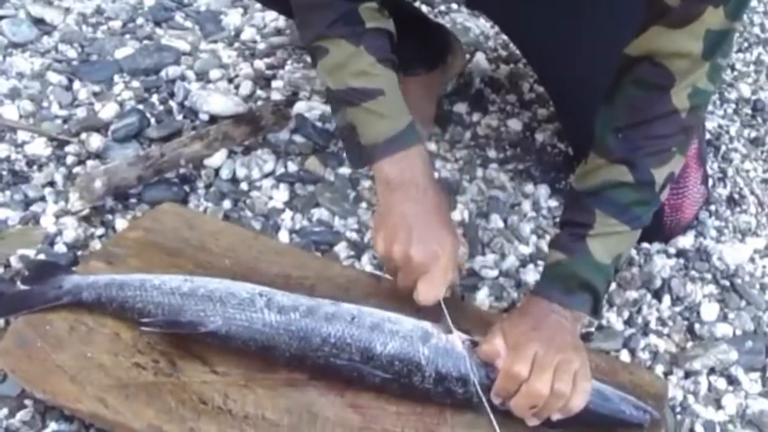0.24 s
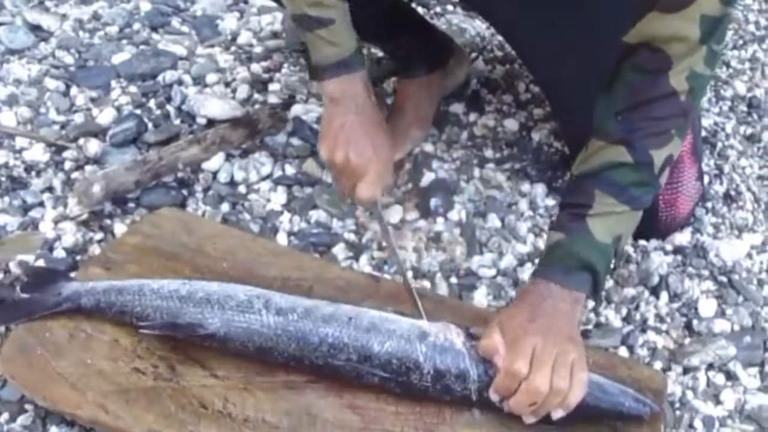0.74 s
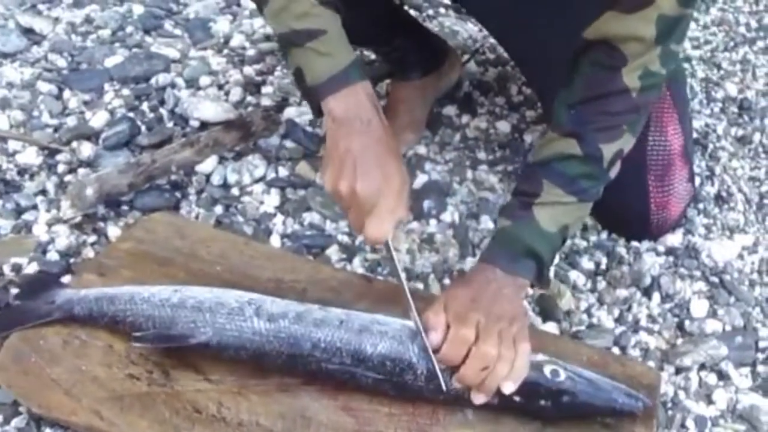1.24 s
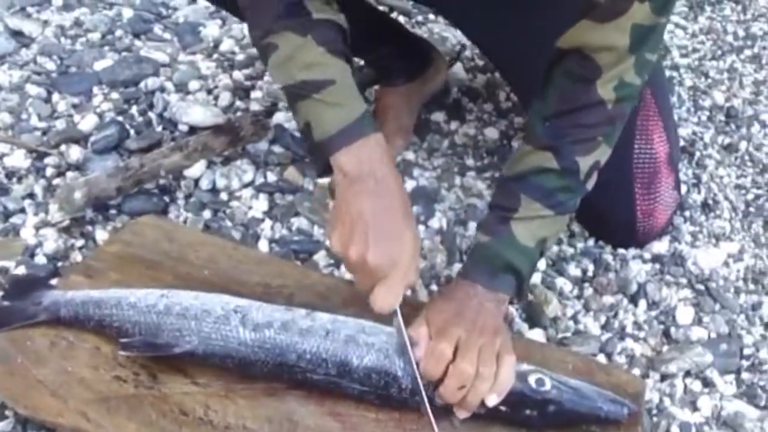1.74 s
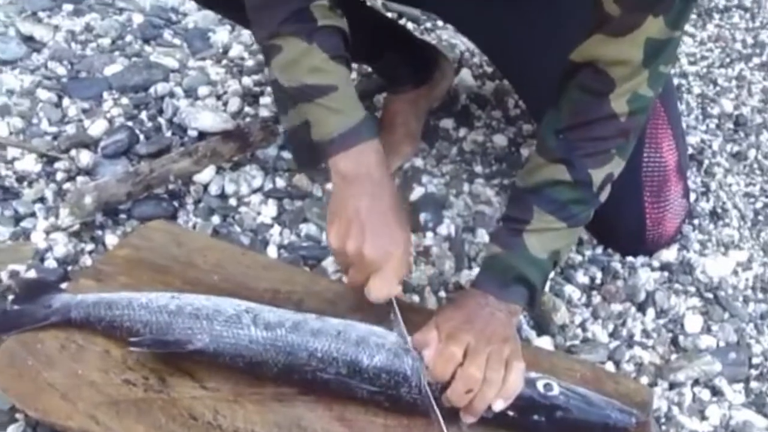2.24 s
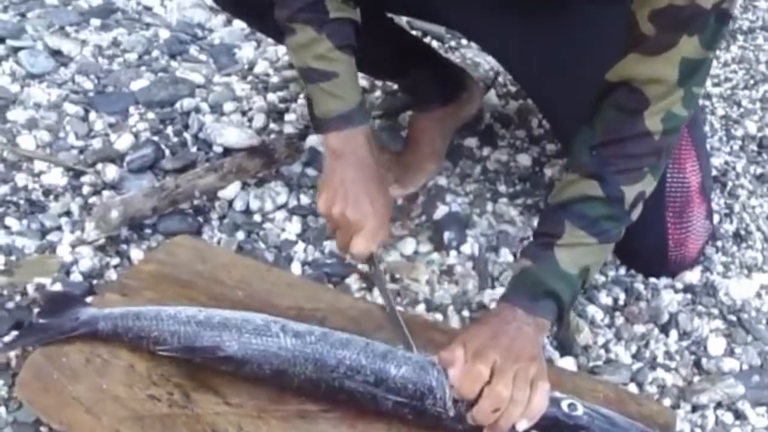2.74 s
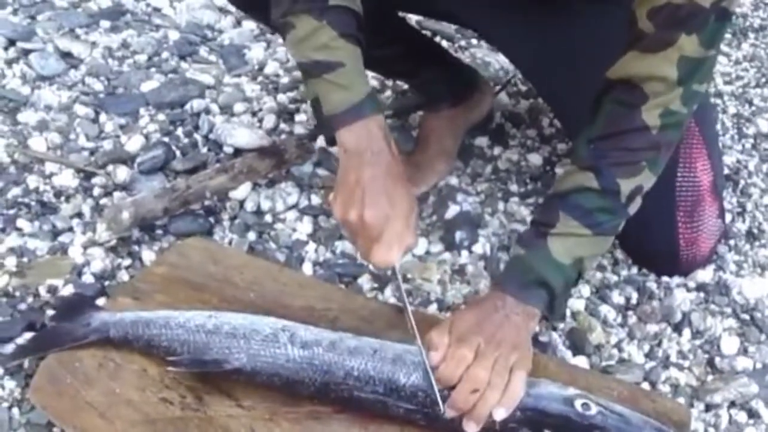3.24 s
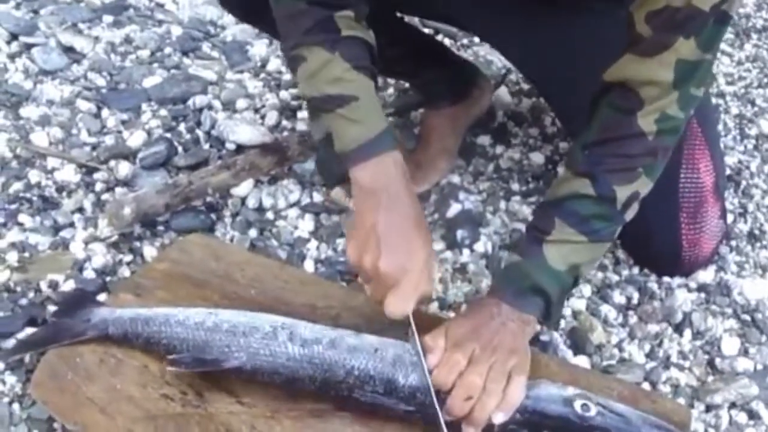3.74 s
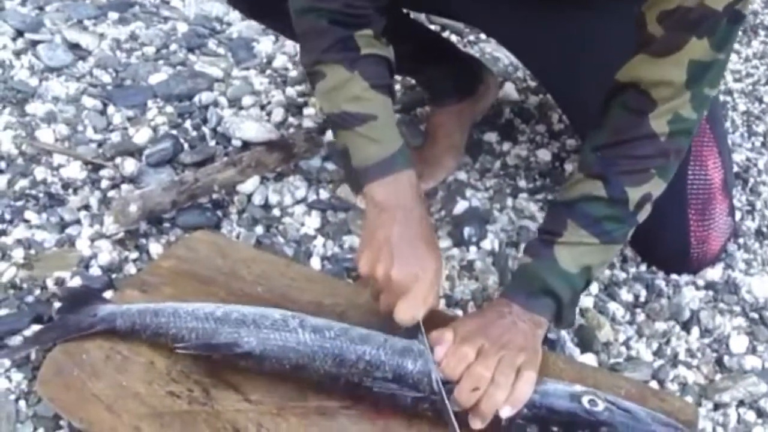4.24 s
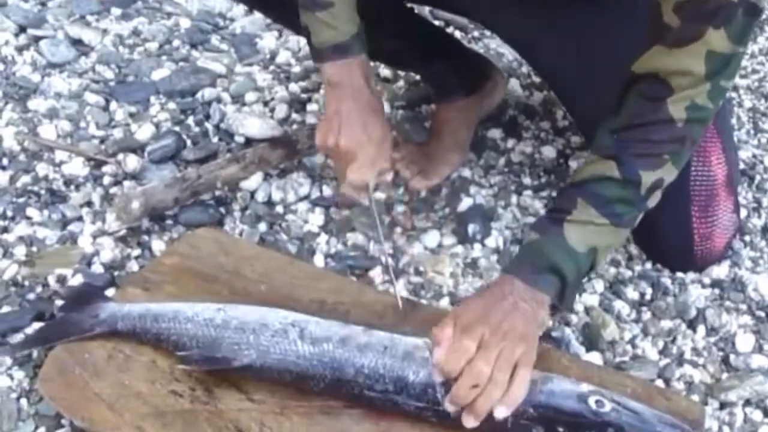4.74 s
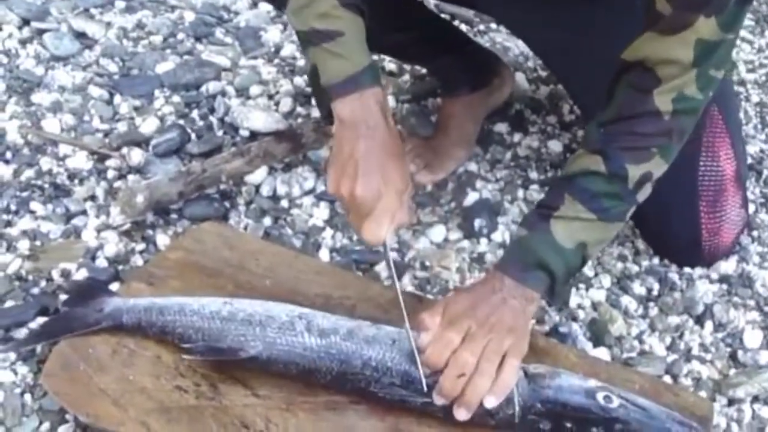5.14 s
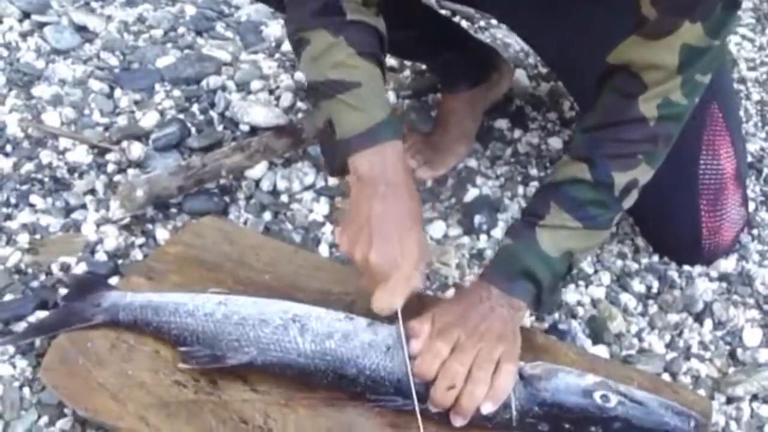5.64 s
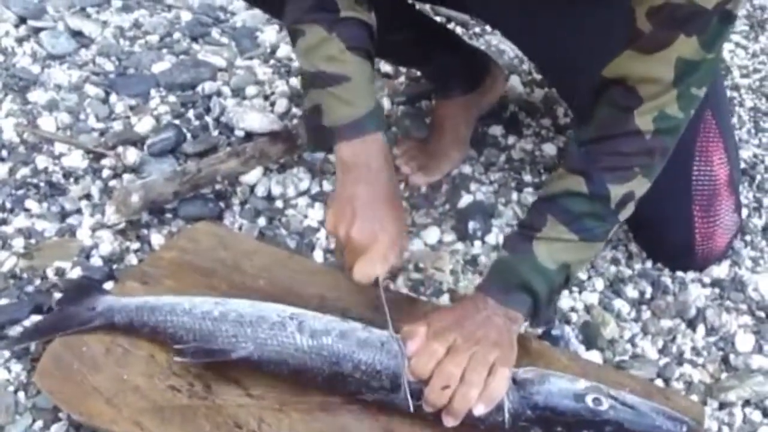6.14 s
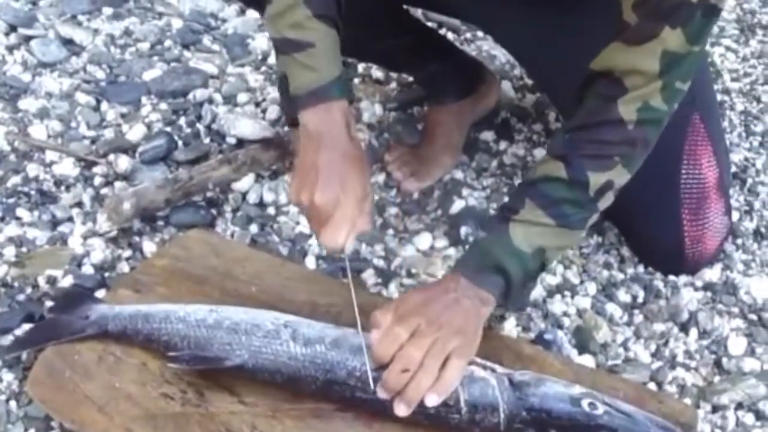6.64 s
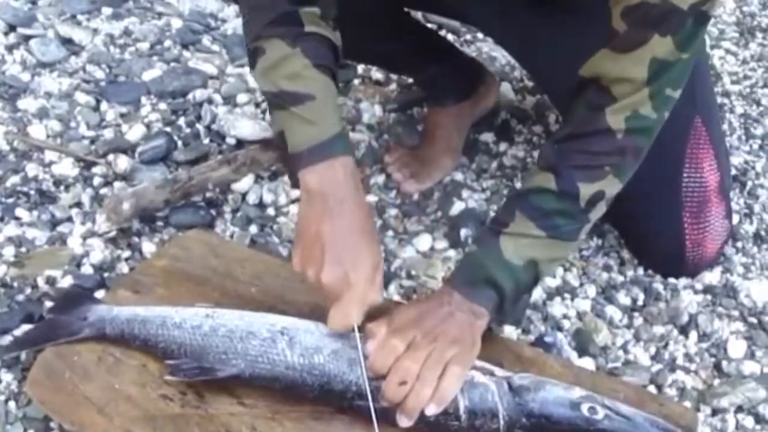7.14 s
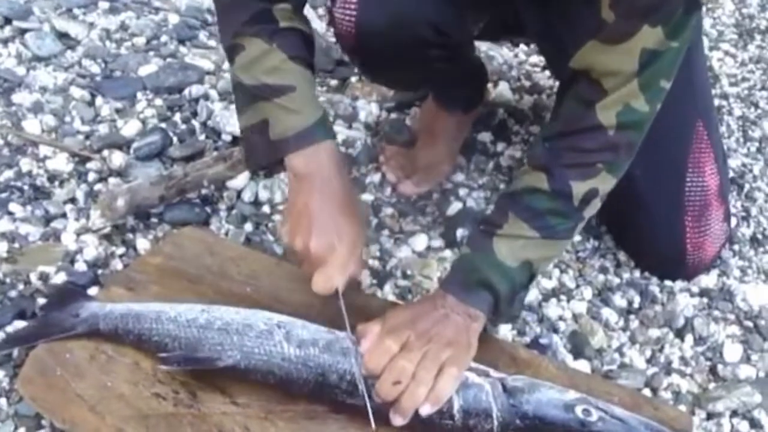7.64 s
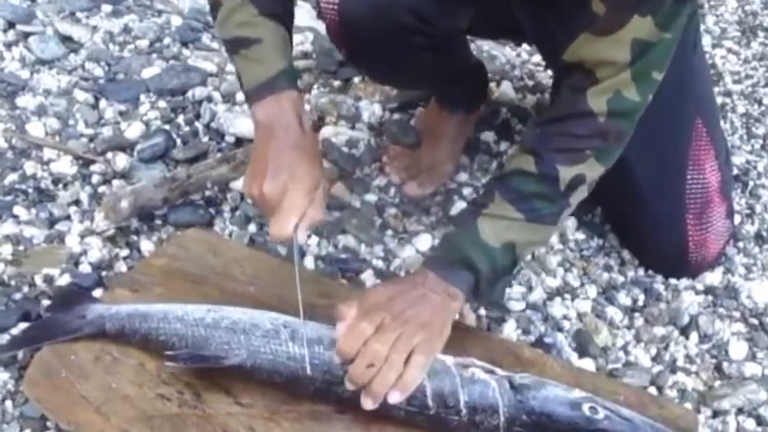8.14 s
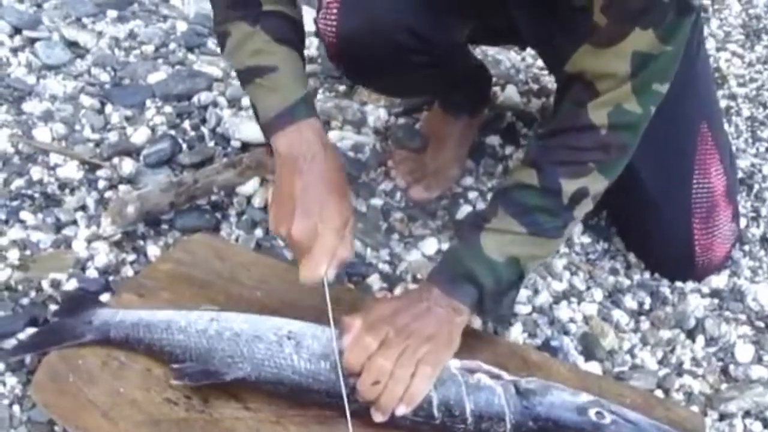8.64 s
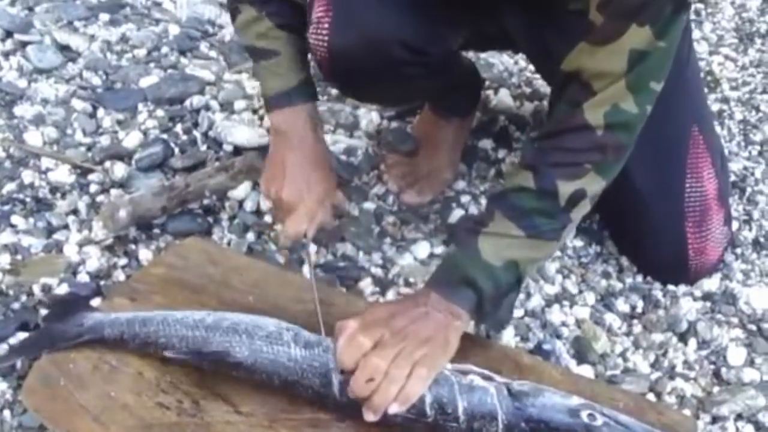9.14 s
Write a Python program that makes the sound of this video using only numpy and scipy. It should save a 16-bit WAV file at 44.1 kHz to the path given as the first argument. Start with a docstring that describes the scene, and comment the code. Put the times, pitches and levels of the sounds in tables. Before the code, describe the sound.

Quiet trickling wash swells into a rattling pebble surge, ebbs, then rises again, amid stony clicks, watery plops and soft board knocks.

```python
"""Waves on pebbles and a fish being scored

Small waves wash up and draw back over a pebble beach, heard through a small boxy microphone.
The wash is filtered noise for foam, short resonances for rolling pebbles, and gliding notes for air pockets.
Close by a fish is scored with a knife on a wooden board: decaying board modes give dull knocks, brief
rings and noise give stone clacks, high notes give thin ticks, and dense clicks give short scrapes."""
import sys
import numpy as np
from scipy import signal
from scipy.fft import rfft, irfft
from scipy.io import wavfile

SR = 44100
rng = np.random.default_rng(int(sys.argv[2]) if len(sys.argv) > 2 else 0)


def transcribe(u):
    """Save the signal u as a 16-bit wav file named by the first command-line argument.

    u: samples, shape (n,) or (channels, n), limited to [-1, 1]; the rate is SR.
    q: integer samples, one column per channel.
    """
    v = np.clip(np.atleast_2d(u).T, -1, 1)
    q = np.round(v * 32767).astype(np.int16)
    wavfile.write(sys.argv[1], SR, q)


N = 414540

# Course of the surge. Each row: time in seconds, level of the pebble-rattle register in dB before
# splashes, bass above its usual share in dB, treble above its usual share in dB.
SURGE = [(0.0, -33.5, -7.5, -1), (0.23, -41.5, 0, 5.5), (1.15, -38, 0.5, 3), (1.54, -37, 0.5, 2.5),
         (1.7, -34, 1, 1), (2.1, -31.5, -1.5, 0.5), (2.8, -32, 1, 1.5), (3.3, -30, 0, 0.5),
         (3.92, -25.5, 0, 2), (4.02, -21.5, 1.5, 1.5), (4.3, -19.5, 0, 0.5), (4.68, -22, 0.5, 0.5),
         (4.97, -20.5, -1, 1.5), (5.2, -21.5, 1, 0.5), (5.44, -22, -3, 2), (5.89, -22.5, -4.5, -1.5),
         (6.05, -22, -2, -0.5), (6.19, -23.5, 0.5, 0), (6.44, -22.5, -2, -2), (6.56, -22.5, -6, -0.5),
         (6.8, -21.5, -1, -0.5), (7.15, -25, -5, 0), (7.27, -27.5, -6, 1), (7.67, -30.5, -4, 3),
         (8.09, -30.5, -4.5, 2), (8.35, -31.5, -2.5, 3), (8.58, -28, -3, -0.5), (8.77, -27, -4, 2),
         (8.86, -21.5, -4, -2.5), (9.06, -23, 0.5, -1.5), (9.2, -24.5, -0.5, 0), (9.28, -23, 2, -2),
         (9.4, -24.5, -3, -1)]
# Wavelets slapping the stones change the level of the whole wash for a moment.
# Each row: time of the extreme in seconds, lift in dB, length in seconds.
SPLASHES = [(0.442, 0, 0.033), (0.652, 4, 0.039), (1.68, 3, 0.038), (1.953, 2, 0.098), (2.177, 1.5, 0.062),
            (2.904, 1, 0.2), (3.813, 3, 0.047), (4.29, -1.5, 0.22), (4.908, 1.5, 0.045), (5.35, 1.5, 0.23),
            (6.048, 0, .1), (6.3, 1.5, 0.048), (6.822, 3, 0.056), (6.974, 1, 0.13), (7.165, 2, 0.034),
            (7.853, 3, 0.11), (8.14, 3.5, 0.13), (8.236, 2.5, 0.091), (8.84, 1, .08)]
# Broad foam crests brighten the hiss near 7 kHz. Each row: peak time in seconds, lift in dB, length in seconds.
CRESTS = [(6.7, 3.5, 1), (8.95, 2, 0.85)]
# Borders between the six registers of the wash, rising, in Hz.
REGISTER_BORDERS_HZ = (633, 1502, 3984, 6000, 8300)
# Usual levels of the three spray registers against the rattle, from low to high, in dB.
SPRAY_LEVELS_DB = (-21, -18.5, -21)
# Bass roll-off of the microphone housing. Each row: frequency in Hz, gain in dB.
HOUSING_BASS = [(30, -53), (100, -41), (150, -14.5), (320, -1), (480, -1.5), (700, -6)]
# Resonances of the microphone housing above the bass. Each row: frequency in Hz, gain in dB.
HOUSING_RESONANCES = [(900, -3), (1120, -1.5), (1450, -7), (1650, -5), (1950, -1.5), (2250, 1),
                      (2700, -0.5), (3000, -4.5), (3200, -9), (3450, -15), (3840, -26), (5200, -12.5),
                      (5760, -24.5), (7400, -14), (8100, -21), (9000, -13), (9750, -17), (10400, -16)]
# Air pockets that close with a gliding note. Each row: start in seconds, level in dB before the wobble,
# starting pitch in Hz, time to decay by 60 dB in seconds, glide as share of the pitch per second.
PLOPS = [(0.640, -25, 660, 0.072, 26.5), (0.650, -27, 915, .04, 38), (0.814, -27, 592, 0.071, 4),
         (1.70, -24, 700, 0.045, 8), (1.745, -22, 960, .05, 14), (3.336, -31, 260, 0.17, -4.5),
         (3.385, -25, 364, 0.16, 4), (3.42, -23, 430, .06, 0), (3.685, -27, 339, 0.18, 2.5),
         (3.976, -23, 480, 0.061, 18), (3.995, -14, 380, 0.027, 1), (4.201, -25, 236, 0.2, 7),
         (5.085, -30, 273, 0.07, 19), (5.824, -24, 308, 0.055, 9), (6.075, -7, 410, 0.024, 11),
         (6.325, -11, 1100, 0.033, -6), (6.41, -21, 1060, 0.044, 4), (6.461, -16, 358, 0.036, 4),
         (6.785, -19, 614, .04, 2), (6.245, -17, 269, 0.039, 7), (6.401, -30, 341, 0.43, 4.5),
         (6.77, -13, 234, 0.041, -3), (6.83, -18, 980, .04, 4), (6.836, -12, 1260, 0.053, 3),
         (6.882, -11, 1150, .025, 4), (6.83, -31.5, 333.6, 0.94, 4), (7.162, -16, 550, 0.042, 1),
         (7.254, -6, 1330, 0.026, -3), (2.356, -21, 1970, 0.065, -1), (2.484, -22, 2170, .05, 9),
         (2.552, -25, 2150, 0.071, 6), (9.335, -13, 950, .04, 1), (8.143, -6, 1080, 0.017, 14),
         (8.2445, -15, 710, 0.028, 4), (8.251, -15.5, 896, 0.041, 29), (8.265, -20, 885, 0.054, -3),
         (8.284, -18, 750, 0.037, -13), (8.128, -20, 814, .04, 4), (8.122, -22, 1150, .03, 4),
         (8.30, -16, 1560, 0.032, -3), (8.312, -21, 1150, .03, -4), (2.74, -16, 1010, 0.027, 4),
         (8.745, -33, 378, 0.12, 3.5), (8.979, -16, 320, 0.037, 23)]
# Knife or hand landing on the board. Each row: start in seconds, base level in dB,
# hardness in dB per octave, share of the free ring time.
KNOCKS = [(0.7454, -23, -5, 0.52), (1.943, -18.5, -2, 0.82), (2.101, -23.5, -9, 1.1),
          (2.7986, -13, 8, 1.15), (3.791, -26, 6, 1.2), (4.628, -14, 6, 1.1), (6.346, -10, 2, 0.79),
          (6.947, -15.5, -5, 1.1), (7.879, -11.5, 4, 1.13), (8.133, -27, -12, 1.1), (9.1733, -7.5, 8, 0.73)]
# Modes of the wooden board. Each row: frequency in Hz, level in dB, free time to decay by 60 dB in seconds.
BOARD_MODES = [(717, 7, 0.016), (356, -15, 0.047), (452, -9, 0.033), (608, -7.5, 0.058), (800, -4.5, 0.016),
               (950, -3.5, 0.025), (1150, -12, .02), (1425, -12, 0.028), (2400, -24, 0.0076)]
# Stone on stone. Each row: start in seconds, level of the ring in dB, pitch in Hz, crack against ring in dB.
CLACKS = [(0.006, -26, 2400, -7), (0.014, -29, 1980, -4), (0.031, -34, 2270, 4), (0.061, -24, 1990, -8),
          (0.0664, -19, 2190, -19.5), (0.135, -30, 2480, -2), (0.142, -23, 2100, 0),
          (0.1465, -21, 2140, -5), (0.302, -20, 1580, -7), (0.379, -23, 2500, -4), (0.417, -23, 2250, 4),
          (0.4322, -29, 2560, 19), (0.4406, -21, 2840, -1), (0.4496, -22, 2620, 6), (0.6793, -22, 1890, -9),
          (0.6985, -22, 1880, 5), (0.726, -30, 2730, -2), (0.7303, -19, 2700, 7), (0.7369, -19, 2280, 2),
          (0.8145, -20, 2650, 0), (0.8164, -12.5, 2050, 4), (0.8216, -19, 1870, -4), (0.838, -23, 1750, -3),
          (0.8656, -18, 2400, -8), (1.047, -24, 2550, 8), (1.2583, -21, 2900, 4), (1.262, -27, 2180, -2),
          (1.321, -22, 1270, -8), (1.63, -19, 2450, 8), (1.698, -18, 1370, -13), (2.1934, -14.5, 2280, -13),
          (2.4813, -19, 2030, 3), (2.387, -17, 2400, -6), (2.5227, -16, 2100, -3), (2.7987, -16, 1510, 9),
          (3.4874, -11.5, 2200, -13), (3.9853, -9, 2220, 5), (4.234, -6, 2000, 5), (4.2991, -5, 1990, -11),
          (5.3857, -7, 2280, 3), (5.643, -3, 2400, -3), (5.663, -8, 2370, -8), (5.754, -10, 2400, -14),
          (6.4677, -8, 2100, 5), (6.637, -4, 2220, -4), (6.705, -21, 2310, -8), (6.821, -8, 2400, -5),
          (6.9253, -10, 2570, 1), (7.124, -10, 2420, -8), (7.2535, -17, 2100, 6), (7.3868, -10, 2500, 5),
          (7.536, -12, 2860, -12), (7.6989, -11.5, 1260, 12), (7.7038, -13, 2500, 1),
          (7.7072, -15, 2430, -6), (7.792, -15, 2570, 3), (7.8384, -15, 2480, 9), (8.1128, -14, 1900, -2),
          (8.132, -4.5, 2270, -5), (8.141, -8, 2300, -2), (8.148, -16, 2150, 0), (8.166, -18, 2050, -2),
          (8.174, -19, 2300, -2), (8.156, -13, 2500, -8), (8.185, -23, 2550, -6), (8.2092, -6.5, 1990, -16),
          (8.2045, -15, 1470, -5), (8.2218, -13, 2400, 3), (8.229, -17, 2150, -4), (8.264, -25, 3050, -6),
          (8.39, -13.5, 2060, 6), (8.5944, -21, 2280, -5)]
# Blade on scales. Each row: start in seconds, base level in dB, base pitch in Hz.
TICKS = [(0.2997, -47, 7520), (0.4415, -46, 4600), (0.4503, -45, 4500), (0.4708, -36, 9150),
         (0.7166, -36, 7940), (0.7309, -39, 4400), (0.8174, -40, 5700), (0.8155, -36, 9000),
         (0.8869, -38, 9050), (1.044, -33, 8700), (1.281, -38, 8700), (1.497, -43, 7380),
         (1.5594, -42, 4300), (2.0145, -33, 7700), (2.1101, -32, 7650), (3.1398, -33, 7600),
         (3.5947, -39, 6510), (5.9434, -28, 7110), (6.832, -33, 7500), (7.182, -30, 5000),
         (7.365, -26, 8650), (7.381, -32, 8600), (7.415, -27, 7500), (7.443, -27, 9200), (7.445, -22, 9000),
         (7.4975, -31, 7300), (7.5, -24, 7200), (7.5, -22, 9350), (7.507, -34, 8900), (7.7897, -31, 8600),
         (8.0052, -29.5, 8950), (8.4726, -34, 8910), (8.4996, -34, 6820)]
# Blade drawn across scales. Each row: start in seconds, length in seconds, peak level in dB.
SCRAPES = [(7.343, 0.115, -33.5), (7.774, 0.068, -34.5)]
# Low thumps, heard now and then. Each row: start in seconds, level in dB, pitch in Hz.
THUMPS = [(0.817, -36, 220), (8.131, -37, 150), (8.982, -38, 190)]

BASS_DB, SLOSH_DB = -14, -4  # usual levels of the two lowest registers against the rattle
SLOSH_FOLLOWS_BASS = 0.76  # share of the bass swing felt near 1 kHz
BASS_LUMPS_DB = 3
SWELL_RISE_SHARE = 0.85  # rise of a swell as a share of its fall
BUBBLES_PER_S, BUBBLE_LOW_HZ, BUBBLE_HIGH_HZ = 110, 700, 2700
BUBBLE_CYCLES = 84  # cycles in a decay of 60 dB
BUBBLE_RISE_PER_CYCLE = 0.00596  # mean share of the starting pitch gained per starting cycle
BUBBLE_SPREAD_DB = 3
STONE_T60_S = 0.015
SCRAPE_SWELL_DB, SCRAPE_RELEASE_S = 9, 0.045
NEAR_FOOT_HZ = 263  # bass limit of the nearby bodies
FAR_SEA_DB = -63.5
UNDERTOW_DB, UNDERTOW_FOLLOWS_BASS = -42, 1.6  # deep roll against the rattle, and its share of the bass swing
CUTOFF_HZ = 10985


def wash():
    """Superposition: foam, stones, spray and bubbles add up, and six registers follow the surge unequally."""
    level_db, weight_db, spray_db = in_time(SURGE)
    level_db = level_db + swells(SPLASHES)

    pebbles = grains(1000.0, 2.4, 560, 3300, cycles=11.5, clump_db=2.0)
    chips = grains(500.0, 2.55, 1000, 4100, cycles=7.1, clump_db=4.5)
    fizz = grains(4000.0, 1.85, 3550, 9900, cycles=8.9, clump_db=3.0)
    gurgles = grains(70.0, 0.66, 169.0, 860, cycles=27.0, clump_db=3.5)
    water = foam(0.3, 1.55)
    water = water + from_db(-12.5) * pebbles + from_db(-13.0) * chips
    water = water + from_db(-5.0) * fizz + from_db(-16.0) * gurgles
    water = water + from_db(-13.5) * bubbles()
    water = coloured(water[None])[0]

    low, middle, high, crest, top = REGISTER_BORDERS_HZ
    spray_low_db, spray_crest_db, spray_top_db = SPRAY_LEVELS_DB
    registers = [
        (low, "low", BASS_DB + weight_db + BASS_LUMPS_DB * drift(2.0)),
        ([low, middle], "band", SLOSH_DB + SLOSH_FOLLOWS_BASS * weight_db),
        ([middle, high], "band", 0),  # the rattle
        ([high, crest], "band", spray_low_db + spray_db),
        ([crest, top], "band", spray_crest_db + spray_db + swells(CRESTS)),
        (top, "high", spray_top_db + spray_db),
    ]
    total = np.zeros(N)
    for hz, kind, db in registers:
        total += rms_one(filtered(water, 4, hz, kind)) * from_db(db)
    return from_db(level_db) * total


def foam(shared_db, own_db):
    """Modulated noise: bursting foam is white noise in narrow bands that swell together and flicker alone."""
    together = drift(11.0)
    edges = np.r_[20, 90 * 2 ** np.arange(0, 7.3, .4)]  # Hz
    white = rng.standard_normal((2, N))
    out = 0
    for k, (low, high) in enumerate(zip(edges, edges[1:])):
        # neighbouring bands draw on separate noises
        band = filtered(white[k % 2], 2, [low, high], "band")
        out = out + band * from_db(shared_db * together + own_db * drift(24.0))
    return rms_one(out)


def grains(per_s, spread_db, low_hz, high_hz, cycles, clump_db):
    """Impulse excitation: random clicks of uneven size, in clumps, set short resonances ringing; rms 1."""
    sizes = from_db(spread_db * np.minimum(rng.exponential(1, N), 4.2)) * rng.choice([-1, 1], N)
    born = rng.random(N) < per_s * from_db(clump_db * drift(9.0)) / SR
    clicks = sizes * born
    pitches = np.geomspace(low_hz, high_hz, 11)
    dealt = rng.integers(0, 11, N)
    out = np.zeros(N)
    for k, hz in enumerate(pitches):
        # weight by pitch keeps the overall spectrum flat
        out += hz / SR * ring(clicks * (dealt == k), hz, cycles / hz)
    return rms_one(out)


def bubbles():
    """Bubble resonance: bursts in clusters of three, each a note that rises as it dies; rms 1."""
    out = np.zeros(N)
    draws = rng.random((int(BUBBLES_PER_S * N / SR), 5))
    for k, (when, place, size, delay, centre) in enumerate(draws):
        if k % 3 == 0:  # a new cluster
            start, pitch = when * (N / SR - .1), centre
        octave_share = pitch + 0.247 * (place - .5)
        hz = BUBBLE_LOW_HZ * (BUBBLE_HIGH_HZ / BUBBLE_LOW_HZ) ** octave_share
        db = -BUBBLE_SPREAD_DB * np.log(size + .02) + 20 * np.log10(hz / SR) / 2
        rise_per_s = BUBBLE_RISE_PER_CYCLE * hz * 2 * place
        add(out, start + .04 * delay, db, hz, BUBBLE_CYCLES / hz, rise_per_s, .003)
    return rms_one(out)


def plops():
    """Cavity resonance: each closing air pocket sounds a dying note, mostly gliding up, of wobbling strength."""
    out = np.zeros(N)
    for s, db, hz, t60, glide in PLOPS:
        add(out, s, db, hz, t60, glide, .004)
    return out * from_db(2.7 * drift(200.0))


def board():
    """Modal excitation: knocks strike every mode, hard ones favour high modes, a resting hand damps the ring."""
    out = np.zeros(N)
    chance_db = rng.normal(0, 1.5, (len(KNOCKS), len(BOARD_MODES)))
    for (s, db, hard_db, ring_share), luck in zip(KNOCKS, chance_db):
        for (hz, mode_db, t60), luck_db in zip(BOARD_MODES, luck):
            tilt_db = hard_db * np.log2(hz / 700)
            add(out, s, db + mode_db + luck_db + tilt_db, hz, t60 * ring_share, 0, .0011)
    return out


def clacks():
    """Impact: one sharp contact with a gritty tail, in the housing colour, beside a short ring."""
    rings, contact = np.zeros(N), np.zeros(N)
    t = np.arange(900) / SR
    noise = rng.standard_normal(N)
    for s, db, hz, grit_db in CLACKS:
        add(rings, s, db, hz, STONE_T60_S, 0, .0010)
        at = round(s * SR)
        tail_db = db + grit_db - 19.0 - 60 * t / (1.1 * STONE_T60_S)
        contact[at:at + len(t)] += from_db(tail_db) * noise[at:at + len(t)]
        contact[at] += from_db(db + grit_db)
    unit = np.max(np.abs(coloured(np.eye(1, 900))))  # peak of a coloured unit click
    crack = filtered(coloured(contact[None])[0], 3, [1000, 3700], "band")
    return rings - crack / unit


def ticks():
    """Damped modes: tiny snaps of blade on scales ring on several high pitches and die at once."""
    out = np.zeros(N)
    for s, db, hz in TICKS:
        for ratio, part_db in [(1.005, 10.5), (0.82, 7.0), (0.934, 8.0), (0.53, -6.0)]:
            add(out, s, db + part_db, hz * ratio, .005, 0, .0004)
    return out


def scrape():
    """Stick and slip: dense tiny snaps as the edge skips over scales; each stroke swells, then lets go."""
    t = np.arange(N) / SR
    strokes = np.zeros(N)
    for s, length, db in SCRAPES:
        end = s + length + SCRAPE_RELEASE_S
        corners_s = [s - .01, s, s + length, end]
        corners_db = [db - 40, db - SCRAPE_SWELL_DB, db, db - 40]
        active = (t > s - .01) * (t < end)
        strokes += active * from_db(np.interp(t, corners_s, corners_db))
    return strokes * grains(5000.0, 2.5, 7000, 10300, cycles=22.0, clump_db=-9.0)


def thumps():
    """Damped oscillation: each thump is a few cycles of a low note."""
    out = np.zeros(N)
    for s, db, hz in THUMPS:
        add(out, s, db, hz, .03, 0, .002)
    return filtered(out, 2, 70, "high")


def rumble():
    """Band-limited noise: a faint steady murmur of the far sea, and a deep roll that follows the surge."""
    level_db, weight_db, _ = in_time(SURGE)
    far, deep = rng.standard_normal((2, N))
    far = filtered(far, 2, [95, 300], "band")
    deep = filtered(deep, 3, [115, 165], "band")
    lumps_db = 2 * drift(4)
    deep_db = level_db + UNDERTOW_DB + UNDERTOW_FOLLOWS_BASS * weight_db + lumps_db
    return from_db(FAR_SEA_DB) * rms_one(far) + from_db(deep_db) * rms_one(deep)


def add(out, s, db, hz, t60, rise_per_s, attack_s):
    """Exponential decay: one dying note, its pitch gliding by a share of the start per second."""
    t = np.arange(int(t60 * SR)) / SR
    phase = 2 * np.pi * hz * (t + rise_per_s * t ** 2 / 2)
    note = np.sin(phase) * from_db(db - 60 * t / t60)
    note = note * np.minimum(t / attack_s, 1)
    at = round(s * SR)
    out[at:at + len(t)] += note[:N - at]


def ring(clicks, hz, t60):
    """Two-pole resonance: a unit click sets a decaying sine of initial height 1 ringing."""
    r = from_db(-60 / (t60 * SR))
    w = 2 * np.pi * hz / SR
    return signal.lfilter([0, np.sin(w)], [1, -2 * r * np.cos(w), r * r], clicks + 1e-18)


def coloured(x):
    """Minimum phase: a causal filter made from the housing gains by folding the cepstrum."""
    hz, db = np.transpose(HOUSING_BASS + HOUSING_RESONANCES)
    grid = np.maximum(np.fft.rfftfreq(8192, 1 / SR), 1)
    log_gain = np.interp(np.log(grid), np.log(hz), db) * np.log(10) / 20
    cepstrum = irfft(log_gain)
    cepstrum[1:4096] *= 2
    cepstrum[4097:] = 0
    response = irfft(np.exp(rfft(cepstrum)))
    return signal.oaconvolve(x, response[None], axes=1)[:, :N]


def filtered(x, order, hz, kind):
    """Frequency selection: a Butterworth filter, flat within its pass band."""
    return signal.sosfilt(signal.butter(order, hz, kind, fs=SR, output="sos"), x)


def swells(rows):
    """Bell-shaped envelope: each lift in dB comes to its extreme and fades away more slowly."""
    t = np.arange(0, N, 40) / SR
    lift = np.zeros(len(t))
    for s, db, length in rows:
        half = length * np.where(t < s, SWELL_RISE_SHARE, 1) / 2
        lift += db * np.exp(-((t - s) / half) ** 2)
    return np.interp(np.arange(N) / SR, t, lift)


def drift(rate):
    """Slow random modulation: coarse noise through two equal one-pole low-passes at rate Hz; rms 1."""
    r = np.exp(-80 * np.pi * rate / SR)  # one step is 40 samples
    noise = rng.standard_normal(N // 40 + 2002)
    slow = signal.lfilter([1], [1, -2 * r, r * r], noise)[2000:]  # skip the settling
    return np.interp(np.arange(N) / 40, np.arange(len(slow)), rms_one(slow))


def in_time(rows):
    """Linear interpolation: the columns of a table become one value per sample."""
    s, *columns = np.transpose(rows)
    return [np.interp(np.arange(N) / SR, s, c) for c in columns]


def rms_one(x):
    """Normalisation by mean power: scale to rms 1."""
    return x / np.sqrt(np.mean(x ** 2) + 1e-20)


def from_db(db):
    """Logarithmic level: decibels to amplitude gain."""
    return np.exp(np.asarray(db) * (np.log(10) / 20))


def scene():
    """Superposition at one microphone; small nearby bodies radiate little deep bass."""
    near = plops() - board() + clacks() + ticks() + scrape()
    near = filtered(near, 3, NEAR_FOOT_HZ, "high")
    return (wash() + rumble() + thumps() + near)[None]


def record(dry):
    """Saturation and band limit: peaks are barely rounded and the top is cut steeply."""
    rounded = 1.6 * np.tanh(dry / 1.6)
    steep = signal.ellip(11, .3, 55, CUTOFF_HZ, fs=SR, output="sos")
    return signal.sosfilt(steep, rounded)


dry = scene()
out = record(dry)
transcribe(out)
```